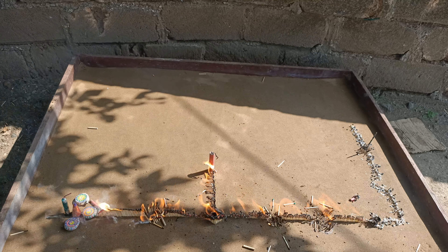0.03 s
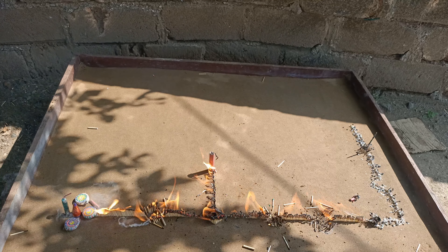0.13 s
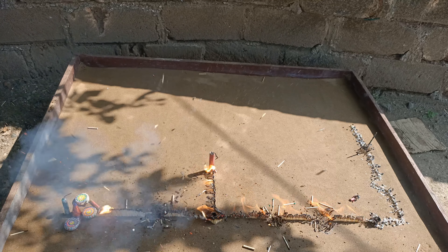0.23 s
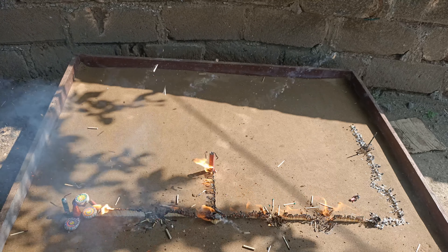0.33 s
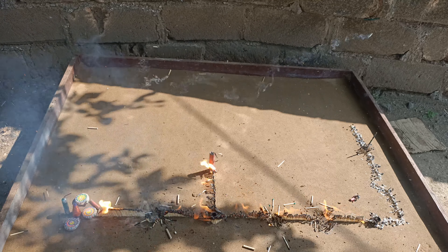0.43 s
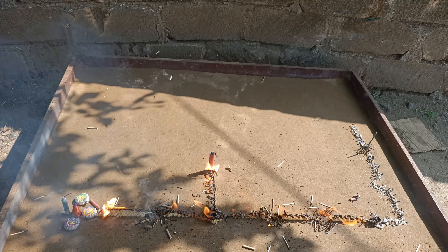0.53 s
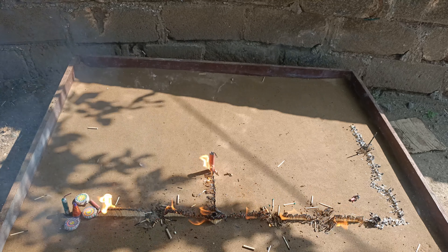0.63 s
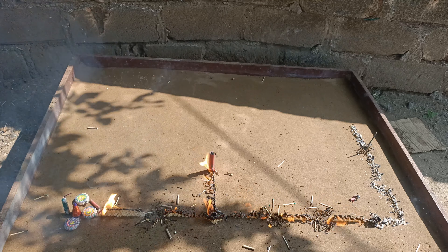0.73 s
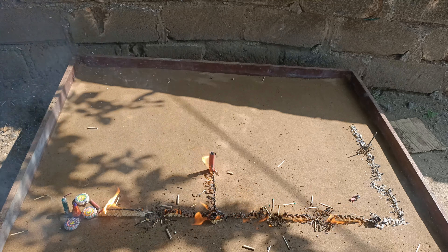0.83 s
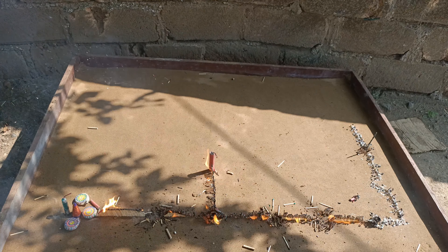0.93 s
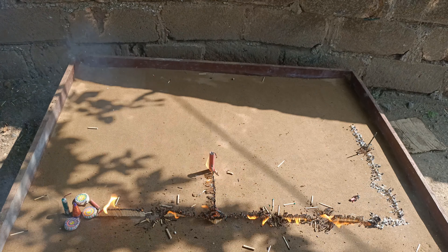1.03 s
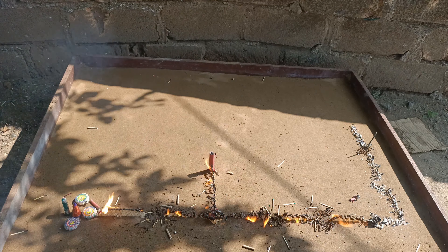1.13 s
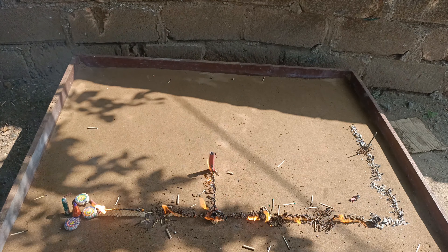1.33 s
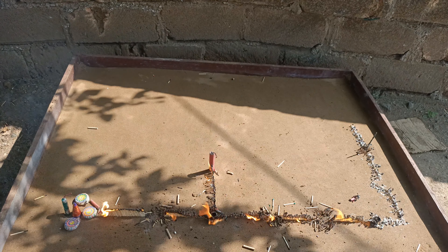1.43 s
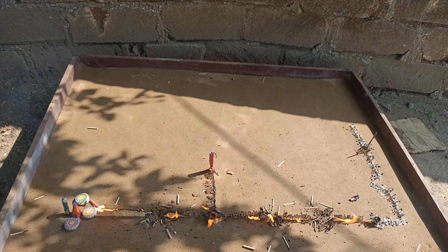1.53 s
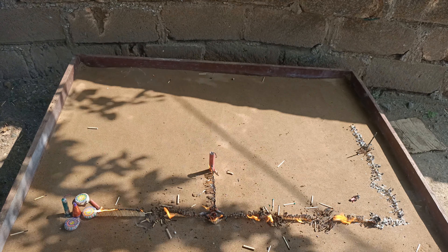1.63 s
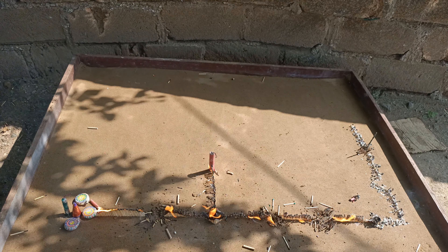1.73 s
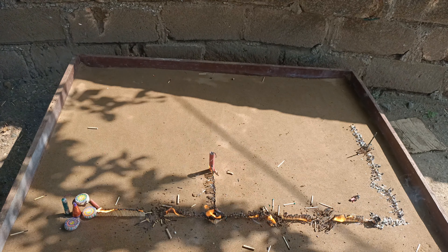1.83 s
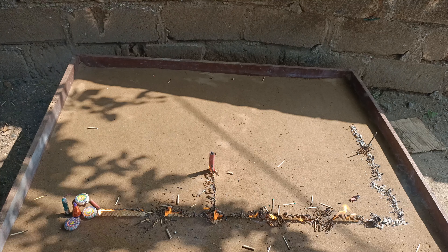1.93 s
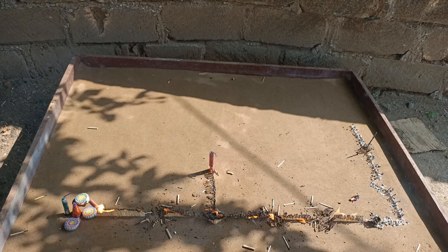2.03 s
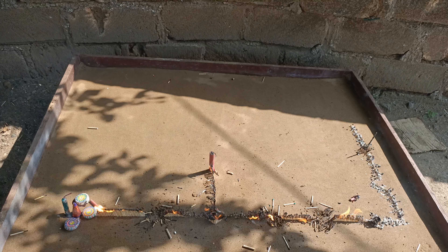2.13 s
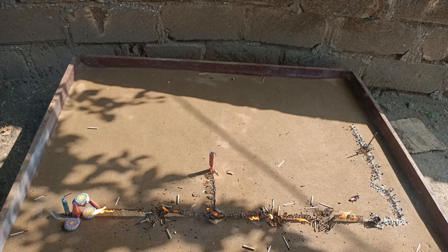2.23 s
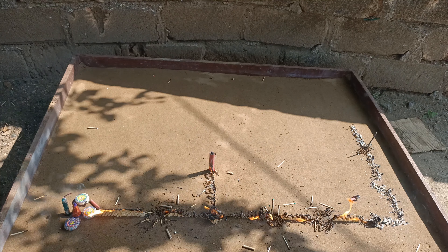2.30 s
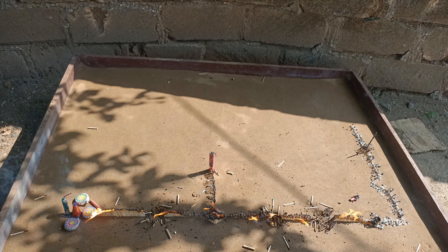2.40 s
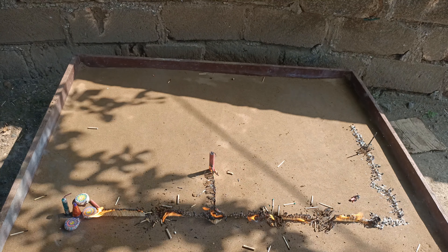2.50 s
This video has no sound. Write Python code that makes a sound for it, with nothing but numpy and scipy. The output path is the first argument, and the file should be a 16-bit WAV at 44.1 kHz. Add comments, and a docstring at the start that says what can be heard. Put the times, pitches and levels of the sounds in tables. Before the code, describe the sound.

A close firecracker cracks hard and overloads the microphone, then rings away into quiet outdoor air

```python
"""Faint outdoor air, shrill insects and fluttering flames come first, then a firecracker goes off close by
on a burning metal tray in a walled yard. Filtered noise makes the air, insects, flutter, fizz and spark.
The bang is a train of overpressure pulses; decaying noise makes the wall echoes, damped modes the tray
and the boom, and short low wave packets the gust and the flame puffs. The recorder limits and clips."""
import sys
import numpy as np
from scipy import signal
from scipy.fft import rfft, irfft, next_fast_len
from scipy.io import wavfile
from scipy.ndimage import uniform_filter1d, map_coordinates

SR = 44100
rng = np.random.default_rng(int(sys.argv[2]) if len(sys.argv) > 2 else 0)


def generate_wav(signal):
    """Clip the signal to [-1, 1] and save it as 16-bit WAV at the path in sys.argv[1]."""
    frames = np.transpose(np.atleast_2d(signal))
    scaled = np.clip(frames, -1, 1) * 32767
    pcm = np.round(scaled).astype(np.int16)
    wavfile.write(sys.argv[1], SR, pcm)


N = 110250  # samples, 2.5 s
BANG_S = .2297  # the firecracker goes off
# All source levels are those ahead of the recorder's limiter.


def amp(db):
    """Decibels to amplitude ratio."""
    return 10 ** (np.asarray(db) / 20)


def unit(x):
    """Normalise to an rms of 1."""
    return x / np.sqrt(np.mean(x ** 2) + 1e-20)


def clock():
    """Time of each sample in seconds."""
    return np.arange(N) / SR


def age(start):
    """Time since start, zero before it."""
    return np.maximum(clock() - start, 0)


def along(points, hz):
    """Interpolate (frequency, value) points on a logarithmic frequency axis."""
    point_hz, value = np.transpose(points)
    return np.interp(np.log(hz + 1), np.log(point_hz + 1), value)


def level(rows):
    """Gain envelope interpolated in decibels from (time, level) rows."""
    return amp(np.interp(clock(), *np.transpose(rows)))


def pan(left_minus_right_db):
    """Intensity stereo: half the level difference goes to each side, with opposite signs."""
    return amp(np.array([[left_minus_right_db], [-left_minus_right_db]]) / 2)


def wobble(rate):
    """Slow modulation: a smooth random curve with rate knots a second."""
    return map_coordinates(rng.standard_normal(N // 8), [clock() * rate + 2], mode="wrap")


def filtered(x, response):
    """Linear filtering: the spectrum of x times a response of frequency."""
    size = next_fast_len(N + SR // 2)
    return irfft(rfft(x, size) * response(np.fft.rfftfreq(size, 1 / SR)), size)[..., :N]


def causal(x, spectrum, size=2048):
    """Minimum-phase filtering: colours a pulse without sound ahead of it."""
    cepstrum = irfft(np.log(amp(along(spectrum, np.fft.rfftfreq(size, 1 / SR)))))
    # folding the cepstrum forward in time gives the minimum phase
    cepstrum[1:size // 2] *= 2
    cepstrum[size // 2 + 1:] = 0
    kernel = irfft(np.exp(rfft(cepstrum)))
    return signal.fftconvolve(x, kernel[None], axes=1)[:, :N]


def noise(spectrum, alike):
    """Partly coherent stereo noise of rms 1: the mid-to-side ratio sets the left-right correlation."""
    def mid_side_response(hz):
        angle = np.arccos(np.clip(along(alike, hz), -1, 1)) / 2
        return amp(along(spectrum, hz)) * [np.cos(angle), np.sin(angle)]

    mid, side = filtered(rng.standard_normal((2, N)), mid_side_response)
    return unit(np.array([mid + side, mid - side]))


def band(centre_hz, width_hz):
    """Band-limited noise: independent left and right under a Gaussian response, rms 1."""
    bell = lambda hz: np.exp(-.5 * ((hz - centre_hz) / width_hz) ** 2)
    return unit(filtered(rng.standard_normal((2, N)), bell))


def puff(start, hz, width_s):
    """Wave packet: a low cosine under a Gaussian envelope centred on start."""
    t = clock() - start
    return np.exp(-.5 * (t / width_s) ** 2) * np.cos(2 * np.pi * hz * t)


RING_FLICKER_DB = 4.5  # each mode swells and dips as it dies


def ringing(modes, waver):
    """Modal decay: damped sines start at the bang, wandering in level and phase (waver in radians)."""
    a = age(BANG_S)
    out = np.zeros((2, N))
    for hz, db, t60 in modes:
        start_phase = rng.uniform(0, min(hz / 100, 2 * np.pi), (2, 1))  # differs left and right
        phase = waver * wobble(14) + start_phase
        decay = amp(db + RING_FLICKER_DB * wobble(22) - 60 * a / t60)
        out += decay * np.sin(2 * np.pi * hz * a + phase)
    return (a > 0) * out


# level of the outdoor air: time_s, level_db
AIR_LEVEL = [(0, -54.5), (.12, -54.5), (.16, -56), (.2, -49), (.7, -55), (1.0, -58), (1.45, -58.5),
             (1.82, -60), (1.87, -61.5), (2.07, -59), (2.11, -56), (2.2, -57), (2.4, -58.5), (2.5, -58)]
# relative spectrum of the outdoor air: frequency_hz, density_db
AIR_SPECTRUM = [(60, -4), (180, 0.5), (400, 4), (700, .5), (1100, -2.1), (2000, -1.5), (3500, -2.5),
                (5000, -2), (7000, -14.5), (10000, -20), (15500, -18.5)]


def air():
    """Broadband ambience: the hush of the outdoors is coloured noise with a slight random swell."""
    hush = noise(AIR_SPECTRUM, [(290, .65), (640, .2), (1400, 0), (3100, -.3), (6800, 0)])
    return hush * level(AIR_LEVEL) * amp(.5 * wobble(26))


# level of the insect chorus before its trim and pulsing: time_s, level_db
INSECT_LEVEL = [(0, -61), (.13, -58.5), (.16, -77), (.45, -72), (.62, -59), (.7, -63), (.82, -60),
                (.95, -69), (1.06, -74), (1.11, -60), (1.21, -63.5), (1.26, -81), (1.32, -68.5),
                (1.47, -66.5), (1.58, -75.5), (1.75, -72.5), (1.82, -60), (1.85, -94.5), (1.94, -83.5),
                (1.97, -64), (2.07, -86), (2.12, -68.5), (2.33, -63), (2.5, -74)]
INSECT_HZ, INSECT_WIDTH_HZ, INSECT_TRIM_DB = 5250, 500, -1.5
INSECT_PULSE_HZ, INSECT_DEPTH = 58.4, .3  # mean pulse rate, modulation depth


def insects():
    """Amplitude modulation: a narrow shrill band of noise pulses with a wandering phase."""
    pulse = 1 + INSECT_DEPTH * np.sin(2 * np.pi * INSECT_PULSE_HZ * clock() + 2 * wobble(15))
    chorus = pan(1.5) * band(INSECT_HZ, INSECT_WIDTH_HZ)
    return amp(INSECT_TRIM_DB) * chorus * pulse * level(INSECT_LEVEL)


# level of the flame flutter before its random swell: time_s, level_db
FLUTTER_LEVEL = [(0, -41), (.08, -54.5), (.5, -48), (.85, -56.5), (1.0, -56.5), (1.14, -55.5), (1.3, -49.5),
                 (1.42, -55), (1.55, -53.5), (1.62, -49.5), (1.83, -49.5), (1.89, -57), (1.98, -50),
                 (2.15, -57.5), (2.23, -45), (2.37, -49), (2.5, -51)]
# relative spectrum of the flutter: frequency_hz, density_db
FLUTTER_SPECTRUM = [(15, -6.5), (28, 0.5), (55, 2), (90, -7.5), (150, -6.5), (230, -25.5), (400, -47.5),
                    (900, -70)]


def flutter():
    """Turbulent combustion: the flames make low noise that swells at random."""
    rumble = noise(FLUTTER_SPECTRUM, [(60, .15), (130, 0.27), (290, .65)])
    return rumble * level(FLUTTER_LEVEL) * amp(2 * wobble(54))


# stronger flame puffs: centre_s, level_db, pitch_hz, left_minus_right_db
PUFFS = [(1.134, -49.5, 60.4, 16), (1.514, -43.5, 45, -16), (2.084, -47, 58.3, 3.5), (2.43, -45, 83, -31),
         (2.484, -40.5, 59.3, -10.5)]
PUFF_WIDTH_S = .012


def flame_puffs():
    """Pulsed flow: each stronger puff of flame is a short low wave packet."""
    return sum(amp(db) * pan(side_db) * puff(s, hz, PUFF_WIDTH_S) for s, db, hz, side_db in PUFFS)


# level of the fizz before its random swell: time_s, level_db
FIZZ_LEVEL = [(0, -57.5), (.14, -61), (.18, -65), (.5, -69), (.62, -55.5), (.7, -67), (.82, -59.5),
              (1.0, -76), (1.13, -65.5), (1.3, -71.5), (1.46, -66.5), (1.62, -83.5), (1.95, -86),
              (2.2, -67), (2.5, -72.5)]
# relative spectrum of the fizz: frequency_hz, density_db
FIZZ_SPECTRUM = [(1000, -16.5), (4000, -4), (6200, -1.5), (8000, -7.5), (10000, -17), (13000, -10),
                 (15500, -9)]


def fizz():
    """High-frequency noise: the thin fizz of the fire is mostly treble and nearly uncorrelated."""
    return noise(FIZZ_SPECTRUM, [(5000, 0.0042)]) * level(FIZZ_LEVEL) * amp(.8 * wobble(40))


SPARK_S, SPARK_DB, SPARK_HZ, SPARK_T60_S = .954, -56, 12970, 0.015


def spark():
    """Impulsive excitation: a tiny tick from the fire is a quickly decaying burst of treble noise."""
    burst = band(SPARK_HZ, 600) + .8 * band(9000, 4000)
    decay = amp(SPARK_DB - 60 * age(SPARK_S) / SPARK_T60_S)
    return (clock() > SPARK_S) * decay * burst


GUST_S, GUST_DB, GUST_HZ, GUST_WIDTH_S = .277, -17.5, 48.3, .018
GUST_LAG_S = .0018  # left port early, right port late by this much


def gust():
    """Bulk flow: the displaced air thumps low at one microphone port, then the other."""
    thumps = [puff(GUST_S + lag, GUST_HZ, GUST_WIDTH_S) for lag in (-GUST_LAG_S, GUST_LAG_S)]
    return amp(GUST_DB) * np.array(thumps)


# modes of the tray, level at the strike before flicker: pitch_hz, level_db, t60_s
TRAY_MODES = [(807, -59, 2.7), (877, -63, 2.7), (1572, -70, 3.6), (2364, -27, .42), (2470, -29, .4),
              (2762, -26, .42), (3199, -28, .48), (3675, -28, .45), (4155, -27, .45)]


def tray():
    """Plate resonance: the sheet metal rings on in its own modes after the blow."""
    return ringing(TRAY_MODES, waver=.9)


# relative spectrum of the wall echo: frequency_hz, density_db
YARD_SPECTRUM = [(30, -13.5), (90, -12), (160, -1), (260, -3), (360, -3.5), (500, -.5), (750, -2.5),
                 (1200, -3), (1900, -1.5), (2800, 0.5), (3900, 0.9), (5200, -4.5), (7000, -13),
                 (10000, -20.5), (15000, -18)]
# decay of the wall echo: frequency_hz, t60_s
YARD_T60 = [(60, .6), (200, .66), (500, .53), (1200, .5), (3600, 0.49), (5500, 0.46), (8000, .35),
            (14000, 0.28)]
# left-right correlation of the near and far echo: frequency_hz, correlation
YARD_ALIKE = [(60, 1), (200, 1), (400, .35), (700, -.1), (1300, -0.55), (2400, 0.15), (4400, -0.093),
              (8000, 0.1)]
# relative spectrum of the far tail: frequency_hz, density_db
FAR_SPECTRUM = [(60, -12), (250, -2.5), (900, -5), (2800, 3), (5000, -8), (9000, -27.5), (15000, -37.5)]
# low standing waves between the walls, level before flicker: pitch_hz, level_db, t60_s
BOOM_MODES = [(176.4, -29.5, 0.85), (217.1, -32, 0.59), (243, -29.5, 0.83), (267.5, -32.5, .72)]
YARD_DB, YARD_BUILD_S, YARD_GRAIN = -3, 0.0026, 0.13  # level before decay, build-up, unevenness
RIPPLE_DB, RIPPLE_HZ = 1.53, 54.93  # spectral ripple from near surfaces: depth, knot spacing
FAR_DB, FAR_T60_S = -37.5, 1.7  # late echo from the surroundings


def yard():
    """Reverberation: diffuse wall echoes as decaying noise, standing-wave boom and a faint far tail."""
    a = age(BANG_S)

    def ripple(hz):
        return amp(RIPPLE_DB * map_coordinates(rng.standard_normal(2048), [hz / RIPPLE_HZ], mode="wrap"))

    diffuse = unit(filtered(noise(YARD_SPECTRUM, YARD_ALIKE), ripple))
    # each frequency of the echo dies at its own rate
    hz, t, bins = signal.stft(diffuse, SR, nperseg=256)
    fade = amp(-60 * np.maximum(t - BANG_S, 0) / along(YARD_T60, hz)[:, None])
    near = signal.istft(bins * fade, SR, nperseg=256)[1][:, :N]
    near = near * unit(np.exp(YARD_GRAIN * wobble(700)))
    far = noise(FAR_SPECTRUM, YARD_ALIKE) * amp(FAR_DB - 60 * a / FAR_T60_S)
    boom = ringing(BOOM_MODES, waver=1.0)
    build_up = 1 - np.exp(-a / YARD_BUILD_S)  # silent until the bang
    return (amp(YARD_DB) * near + far + boom) * build_up


# reflections off the tray rim and the walls, level before colouring: delay_s, level_db, left_minus_right_db
SLAPS = [(.0009, 7.5, -5), (.0043, -2, -6), (.0098, -3.5, -3), (.0185, -3, -1.5), (.025, -1.5, 1),
         (.037, 0.5, 1.5), (.047, -1.5, -2), (.068, -7, -0.5)]
SHOCK_S, SHOCK_DB = .00037, 1.5  # length of the overpressure, its level before colouring
PORT_JITTER_S = .00012  # spread of the random arrival time at each port


def shock():
    """Blast wave: abrupt overpressure then decaying suction, repeated by discrete early reflections."""
    out = np.zeros((2, N))
    for delay, db, side_db in [(0, SHOCK_DB, 0.0083)] + SLAPS:
        arrival = BANG_S + delay + rng.normal(0, PORT_JITTER_S, (2, 1))
        u = (clock() - arrival) / SHOCK_S
        pulse = (u >= 0) * (1 - u) * np.exp(-np.abs(u))
        out += amp(db) * pan(side_db) * pulse
    return causal(out, [(100, -2), (1000, -3.5), (3000, 2.5), (6000, -1), (15000, -1)])


def scene():
    """Superposition: the pressures of all sources add."""
    fire = flutter() + flame_puffs() + fizz() + spark()
    return air() + insects() + fire + gust() + tray() + yard() + shock()


LIMIT_DB, LIMIT_WINDOW_S = -7.5, .005  # rms ceiling, window of past sound it is judged over
CLIP_TOP, TOP_HZ = .9, 15800  # full-scale amplitude of the soft clip, upper band edge


def record(dry):
    """Overload: a limiter holds the bang down, peaks that pass it clip softly, and the top is cut off."""
    size = max(int(LIMIT_WINDOW_S * SR), 8)
    power = uniform_filter1d(np.mean(dry ** 2, axis=0), size, origin=(size - 1) // 2)
    rms = np.sqrt(np.abs(power) + 1e-12)
    gain = uniform_filter1d(np.minimum(1, amp(LIMIT_DB) / rms), size=64)
    held = dry * gain
    clipped = held / (1 + np.abs(held / CLIP_TOP) ** 6) ** (1 / 6)
    return filtered(clipped, lambda hz: 1 / (1 + (hz / TOP_HZ) ** 160))


dry = scene()
out = record(dry)
generate_wav(out)
```